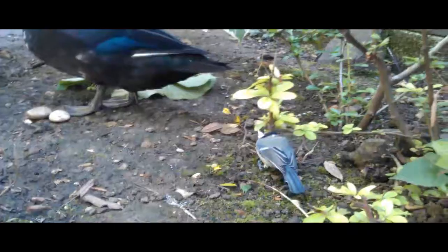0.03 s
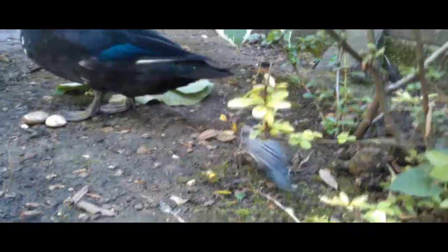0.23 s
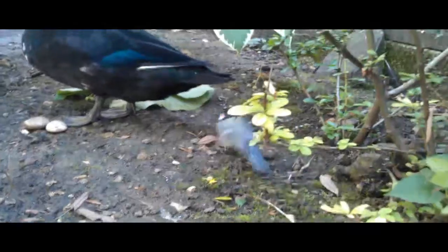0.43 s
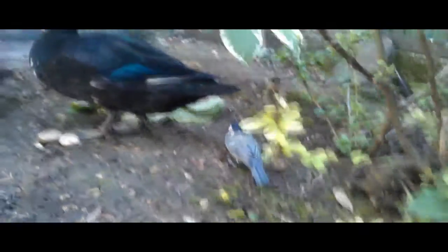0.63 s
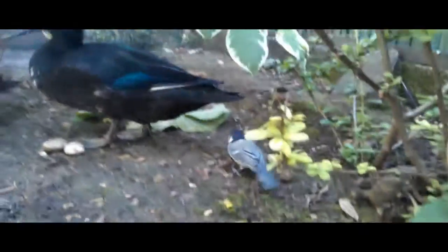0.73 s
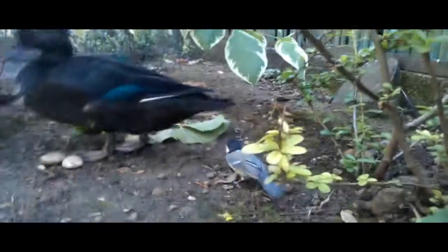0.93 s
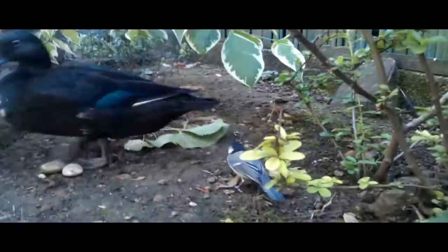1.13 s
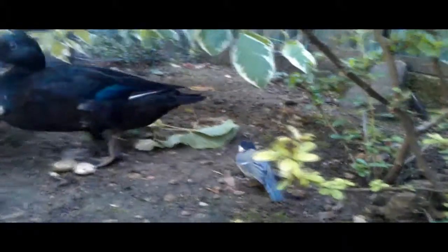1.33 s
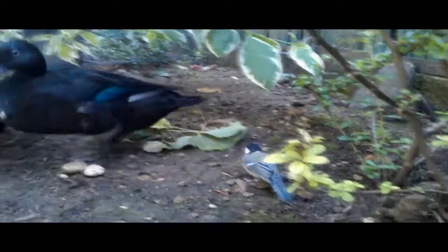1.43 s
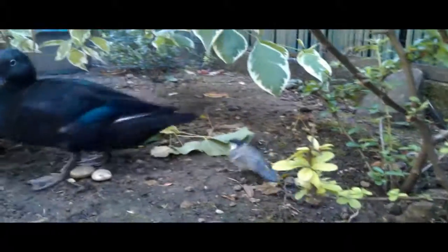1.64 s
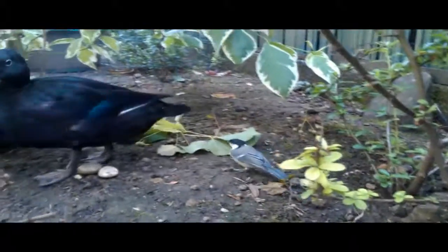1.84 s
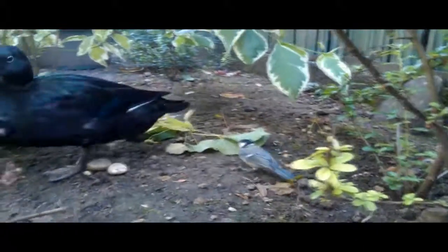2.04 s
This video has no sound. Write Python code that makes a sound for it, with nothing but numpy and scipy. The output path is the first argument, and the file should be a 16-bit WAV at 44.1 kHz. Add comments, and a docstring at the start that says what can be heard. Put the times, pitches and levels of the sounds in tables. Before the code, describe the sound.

A duck and a small bird scuffle on dry soil. At about 0.25 seconds comes one close, bright swish with a light, hollow knock. Faint shuffles and tiny ticks of grit and dry leaf follow, with soft low bumps from about 1 to 1.3 seconds. Around 1.8 seconds there is a quick run of gritty scuffs. Quiet garden hiss and distant rumble with a faint wavering drone continue throughout.

```python
"""One close, bright swish and a later run of gritty scuffs, as a duck and a small bird move on dry soil.
Both are friction: a stream of tiny slips over a smooth rub. The swish carries a light, hollow knock
and a puff of air. Faint shuffles and tiny ringing ticks of grit and dry leaf fill the gaps.
The bed is a quiet garden: distant rumble with a wavering drone, soft bumps, airy wash and thin hiss."""
import sys
import numpy as np
from scipy import signal
from scipy.fft import rfft, irfft
from scipy.io import wavfile

SR = 44100
rng = np.random.default_rng(int(sys.argv[2]) if len(sys.argv) > 2 else 0)


def unload_wav(signal):
    """Save mono or channel-first audio to the path in sys.argv[1] as 16-bit WAV at rate SR, clipped to [-1, 1]."""
    wavfile.write(
        sys.argv[1],
        SR,
        np.round(np.clip(np.atleast_2d(signal).T, -1, 1) * 32767).astype(np.int16),
    )


N = 92610
T = np.arange(N) / SR

# Level rides of the garden bed (time [s], level [dB])
RUMBLE_RIDE = [(0.03, -57), (0.2, -58.5), (0.61, -56), (0.91, -53.5), (2.1, -55.5)]
WASH_RIDE = [(0.03, -53), (0.5, -53.5), (1.1, -52.5), (1.6, -53.5), (2.1, -53)]
HISS_RIDE = [(0.03, -57), (0.2, -61), (0.5, -62.5), (1.4, -63), (2.1, -60)]
DRONE_RIDE = [(0.03, -65.5), (0.6, -67), (1.2, -61), (1.6, -71), (1.95, -54.5), (2.1, -57)]
# EQ curves of the bed (frequency [Hz], relative level [dB])
RUMBLE_EQ = [(25, -67), (60, -43), (100, -23), (160, -8.5), (230, -1), (320, 1), (400, -4.5), (560, -8),
             (800, -26), (2000, -83)]
WASH_EQ = [(100, -67), (400, -2), (700, -3), (1100, 1.5), (1600, -1.5), (2000, -7), (2600, -17.5),
           (4000, -20.5), (8000, -37)]
HISS_EQ = [(500, -20.5), (3000, -0.5), (5000, -3.5), (7000, -6), (10000, -4.5), (13000, -5.5),
           (15500, -8.5)]
# Soft low bumps (peak time [s], level [dB], rise [s], fall [s])
BUMPS = [(0.959, -44, 0.018, 0.016), (1.08, -50.5, 0.021, 0.12), (1.19, -52, 0.026, 0.03),
         (1.235, -44.5, 0.007, 0.018), (1.315, -52.5, 0.03, 0.043)]

# Strokes through leaves and over soil (peak time [s], level [dB], rise [s], fall [s], tilt [dB/octave])
SHUFFLES = [(0.13, -61.5, 0.23, 0.094, -10), (0.485, -58, 0.013, 0.024, 7), (0.636, -49.5, 0.012, 0.12, 15),
            (0.676, -48, 0.047, 0.096, 6), (0.715, -53.5, 0.14, 0.074, -7), (0.768, -55.5, 0.035, 0.04, -2),
            (0.85, -61.5, 0.1, 0.09, -1), (1.043, -51, 0.0059, 0.03, 5), (1.059, -46, 0.017, 0.016, 4),
            (1.1, -61, 0.045, 0.04, 3), (1.17, -59.5, 0.071, 0.17, 6), (1.635, -58, 0.068, 0.059, -5),
            (2.01, -69, 0.12, 0.15, -2)]
SCUFFS = [(1.773, -34.5, 0.025, 0.032, -1), (1.788, -31.5, 0.019, 0.043, -1),
          (1.802, -35, 0.033, 0.027, -3), (1.823, -30, 0.0039, 0.031, 1.5),
          (1.836, -28.5, 0.031, 0.026, 3.5), (1.859, -43.5, 0.015, 0.044, -4.5),
          (1.878, -43, 0.0057, 0.013, -2.5)]
# Grit and dry leaf (time [s], level [dB], pitch [Hz], width [octaves])
TICKS = [(0.094, -50, 7240, 0.25), (0.101, -51, 7200, 0.25), (0.115, -50, 7000, 0.25),
         (0.123, -53, 7000, 0.23), (0.1335, -48.5, 7100, 0.25), (0.156, -47, 7300, 0.44),
         (0.162, -48, 6960, 0.27), (0.168, -49, 7000, 0.25), (0.2298, -23, 7300, 0.82),
         (0.2505, -16, 7300, 0.3), (0.2585, -20.5, 8500, 0.92), (0.2647, -15, 8300, 0.46),
         (0.302, -39, 8600, 0.81), (0.3062, -43, 8500, 0.6), (0.318, -40.5, 7550, 0.35),
         (0.374, -48.5, 8540, 0.45), (0.626, -45, 8500, 0.9), (0.767, -47, 8600, 0.6),
         (0.835, -53.5, 8000, 0.5), (0.891, -49.5, 8700, 0.4), (1.04, -47.5, 8400, 0.59),
         (1.082, -54, 9500, 0.3), (1.149, -52, 9400, 0.3), (1.629, -53, 5500, 0.7),
         (1.721, -42, 6350, 0.35), (1.7803, -26, 7400, 1.2), (1.7872, -27, 6000, 0.77),
         (1.79, -30, 6070, 0.37), (1.7953, -32, 6000, 1.1), (1.994, -49, 7850, 0.5)]
# Envelope of the thin brush into the scuffs (time [s], level [dB])
LEAD_IN_ENVELOPE = [(1.66, -75), (1.70, -62), (1.718, -52), (1.721, -43.5), (1.735, -42), (1.752, -54),
                    (1.78, -75)]
# EQ curves of the movements on the ground (frequency [Hz], relative level [dB])
SHUFFLE_EQ = [(500, -51), (2500, -11.5), (4500, -7), (5700, -3), (7000, -6.5), (8500, -2), (10000, -8.5),
              (12500, -18.5), (15500, -32)]
DULL_RUSTLE_EQ = [(100, -43), (1000, -6), (1800, -3), (2250, 6), (2700, -11), (4500, -12), (8000, -30)]
LEAD_IN_EQ = [(500, -43), (3000, -20), (4500, -10.5), (5600, -2.5), (6300, -0.5), (7600, -12), (9000, -4),
              (10500, -19), (15500, -24)]
SCUFF_EQ = [(40, -60), (200, -30), (1200, -18.5), (2300, -17.5), (3200, -2.5), (4900, -3), (6400, 0.5),
            (8100, -6), (9200, -2.5), (10200, -13), (12000, -13.5), (15500, -26)]

# Hollow ring of the knock (frequency [Hz], relative level [dB], 60 dB decay [s])
KNOCK_MODES = [(543, -0.5, 0.12), (774, -6, 0.04), (1116, -0.5, 0.066), (1350, -2, 0.05)]
# Pressure of the swish (time [s], level [dB])
SWISH_ENVELOPE = [(0.21, -90), (0.226, -44), (0.237, -36.5), (0.250, -19.5), (0.2648, -20), (0.267, -29),
                  (0.275, -30.5), (0.284, -50.5), (0.305, -51.5), (0.34, -72)]
# Its crossfade, brightest when fully pressed (time [s], bright share [0-1])
SWISH_BRIGHTNESS = [(0.222, 0.9), (0.232, 0), (0.253, 0.31), (0.260, 1), (0.266, 1), (0.275, 0.3),
                    (0.30, 0.4)]
# The air it pushes (peak time [s], level [dB], rise [s], fall [s])
PUFF = [(0.266, -64, 0.012, 0.07)]
# EQ curves of the swish and its puff (frequency [Hz], relative level [dB])
SWISH_EQ = [(60, -51), (300, -36), (540, -28), (750, -29), (1400, -18.5), (2200, -20), (3300, -25.5),
            (4200, -15), (5200, -13.5), (6000, -6.5), (7000, -1), (8000, -3), (8800, -10), (9600, -3),
            (10600, -15.5), (12500, -20), (15500, -22)]
PUFF_EQ = [(10, 0), (25, -5), (60, -21), (150, -31), (600, -79)]


def from_db(db):
    """Decibels to gain."""
    return 10 ** (np.asarray(db) / 20)


def unit_power(x):
    """Scale to an RMS of one."""
    return x / np.sqrt(np.mean(x ** 2) + 1e-20)


def ride(points):
    """A fader ride: gain through (time [s], level [dB]) points."""
    return from_db(np.interp(T, *np.transpose(points)))


def gesture(points):
    """A fader ride, muted before its first point and after its last."""
    return ride(points) * (T > points[0][0]) * (T < points[-1][0])


def stroke(peak_s, db, rise_s, fall_s):
    """An envelope that swells 20 dB per rise time and dies away 20 dB per fall time."""
    from_peak = np.maximum((peak_s - T) / max(rise_s, 1e-4), (T - peak_s) / max(fall_s, 1e-4))
    return from_db(db - 20 * from_peak)


def equalise(x, eq, tilt=0):
    """Apply an EQ curve and a tilt in dB per octave; unit power."""
    octave = np.log2(np.maximum(np.arange(N // 2 + 1) * SR / N, 1))
    hz, db = np.transpose(eq)
    tilt_db = tilt * np.clip(octave, np.log2(hz[0]), np.log2(hz[-1]))
    gain = from_db(np.interp(octave, np.log2(hz), db) + tilt_db)
    return unit_power(irfft(rfft(x) * gain, N))


def noise(eq):
    """Smooth noise through an EQ curve."""
    return equalise(rng.standard_normal(N), eq)


def bandpass(x, low_hz, high_hz):
    """One band, with make-up gain for the noise power filtered away."""
    band = signal.butter(2, [low_hz, high_hz], "band", fs=SR, output="sos")
    return signal.sosfilt(band, x + 1e-18) * np.sqrt(SR / 2 / (high_hz - low_hz))


def friction(slips_per_s, spread_db, smooth_db):
    """Many tiny slips of uneven size over a smooth rub."""
    sizes = from_db(spread_db * np.minimum(rng.exponential(1, N), 4)) * rng.choice([-1, 1], N)
    slips = sizes * (rng.random(N) < slips_per_s / SR)
    return unit_power(slips) + from_db(smooth_db) * rng.standard_normal(N)


def garden():
    """The noise bed: distant rumble, a few soft bumps, an airy wash and a thin hiss."""
    rumble = ride(RUMBLE_RIDE) * noise(RUMBLE_EQ)
    pushes = sum(stroke(*bump) for bump in BUMPS) * rng.standard_normal(N)
    bumps = bandpass(pushes, low_hz=186, high_hz=395)
    wash = ride(WASH_RIDE) * noise(WASH_EQ)
    hiss = ride(HISS_RIDE) * noise(HISS_EQ)
    return rumble + bumps + wash + hiss


def drone(pitch_hz=326, width_hz=15):
    """A faint, wavering tone in the rumble: noise twice through one narrow resonance."""
    b, a = signal.iirpeak(pitch_hz, pitch_hz / width_hz, fs=SR)
    drive = rng.standard_normal(N + SR)  # one second of pre-roll lets the ring build
    tone = signal.lfilter(b, a, signal.lfilter(b, a, drive))[SR:]
    return ride(DRONE_RIDE) * unit_power(tone)


def shuffles():
    """Sparse, crackly slips among leaves, and one very short, dull rustle midway."""
    leaves = dict(slips_per_s=1200, spread_db=8.5, smooth_db=3)
    crackle = sum(stroke(*shape) * equalise(friction(**leaves), SHUFFLE_EQ, tilt)
                  for *shape, tilt in SHUFFLES)
    dull_rustle = stroke(peak_s=1, db=-50, rise_s=0.01, fall_s=0) * noise(DULL_RUSTLE_EQ)
    return crackle + dull_rustle


def ticks():
    """Tiny cracks of grit and dry leaf, each ringing briefly in one resonance."""
    track = 0
    for time_s, db, hz, octaves in TICKS:
        crack = stroke(time_s, db, rise_s=0.0007, fall_s=0.0032) * rng.choice([-1, 1], N)
        edge_ratio = 2 ** (octaves / 2)
        track = track + bandpass(crack, hz / edge_ratio, hz * edge_ratio)
    return track


def scuffs():
    """A thin, almost whistling brush leads into overlapping strokes over gritty soil."""
    grit = dict(slips_per_s=5000, spread_db=2.5, smooth_db=-2)
    lead_in = gesture(LEAD_IN_ENVELOPE) * equalise(friction(**grit), LEAD_IN_EQ)
    strokes = sum(stroke(*shape) * equalise(friction(**grit), SCUFF_EQ, tilt)
                  for *shape, tilt in SCUFFS)
    return lead_in + strokes


def knock(time_s=0.2295, db=-41.5):
    """A light, hollow knock as the swish begins: four modes of alternating polarity, struck once."""
    age = np.maximum(T - time_s, 0)
    return sum((-1) ** k * from_db(db + mode_db - 60 * age / t60) * np.sin(2 * np.pi * hz * age)
               for k, (hz, mode_db, t60) in enumerate(KNOCK_MODES))


def swish(tilt_db_per_octave=2):
    """A quick, close brush of dense slips that swells, brightens and breaks off, pushing a puff of air."""
    slips = friction(slips_per_s=12000, spread_db=1.5, smooth_db=0)
    dark = equalise(slips, SWISH_EQ, -tilt_db_per_octave)
    bright = equalise(slips, SWISH_EQ, tilt_db_per_octave)
    crossfade = np.interp(T, *np.transpose(SWISH_BRIGHTNESS))
    rub = (1 - crossfade) * dark + crossfade * bright
    puff = stroke(*PUFF[0]) * noise(PUFF_EQ)
    return gesture(SWISH_ENVELOPE) * rub + puff


def scene():
    """The bed and the movements, mixed to mono."""
    return (garden() + drone() + knock() + swish() + scuffs() + shuffles() + ticks())[None]


def record(dry):
    """A quick fade-in and a steep high cut."""
    fade_in_s, cutoff_hz = (0.021, 0.027), 15800
    faded = dry * np.interp(T, fade_in_s, [0, 1])
    high_cut = signal.ellip(12, .1, 85, cutoff_hz, fs=SR, output="sos")
    return signal.sosfilt(high_cut, faded)


dry = scene()
out = record(dry)
unload_wav(out)
```